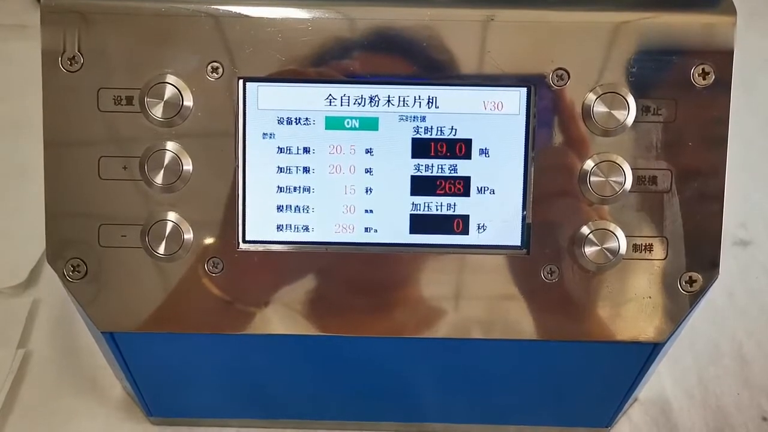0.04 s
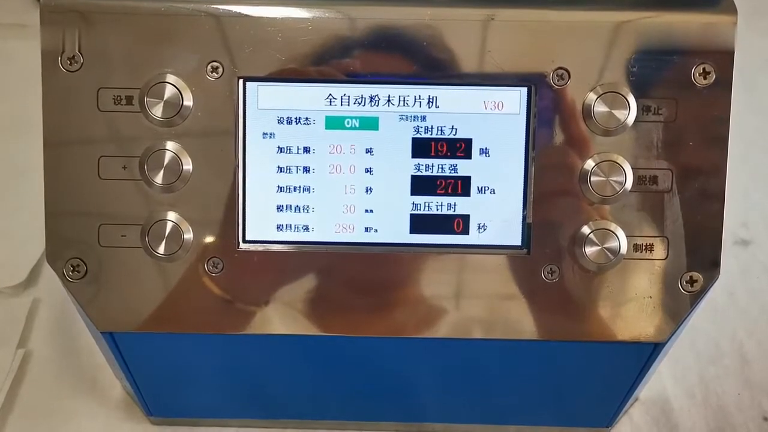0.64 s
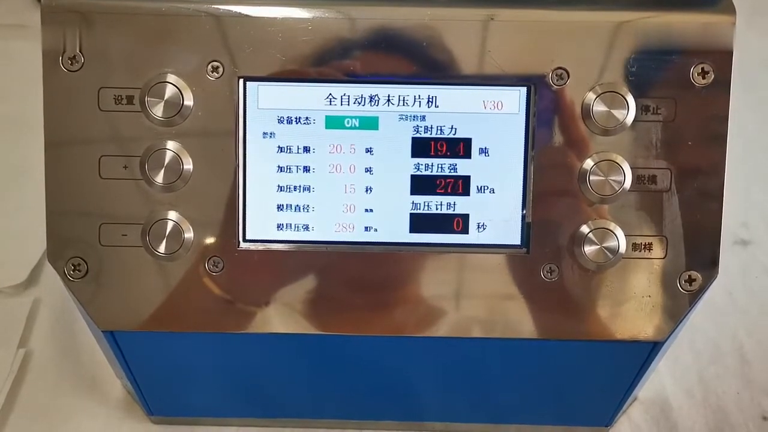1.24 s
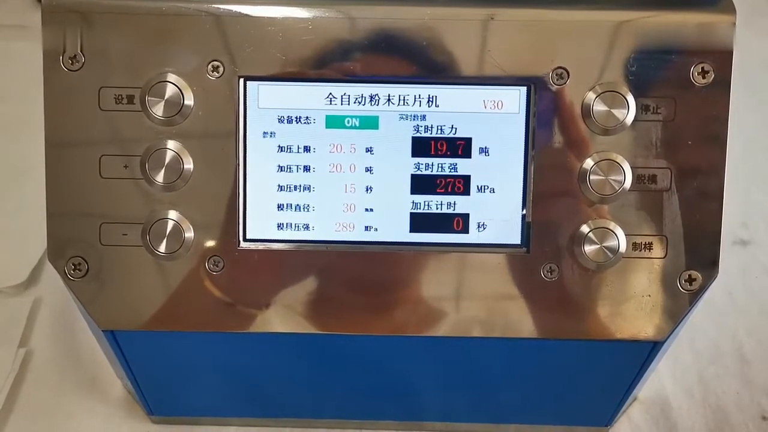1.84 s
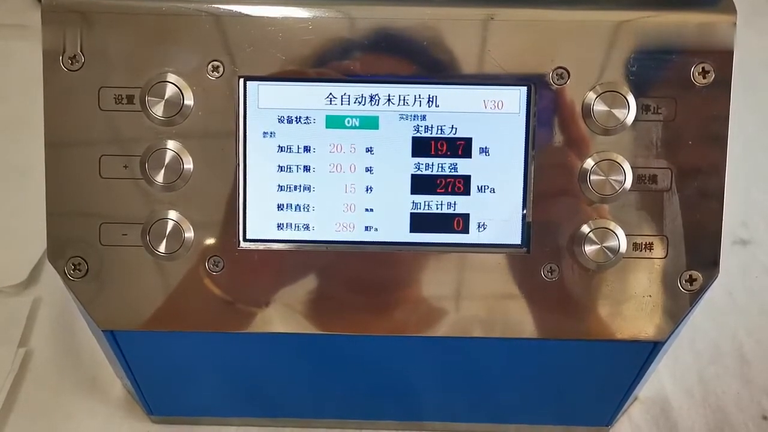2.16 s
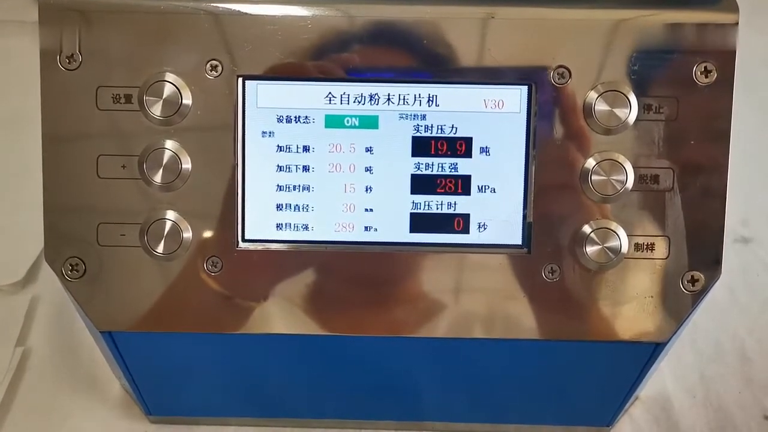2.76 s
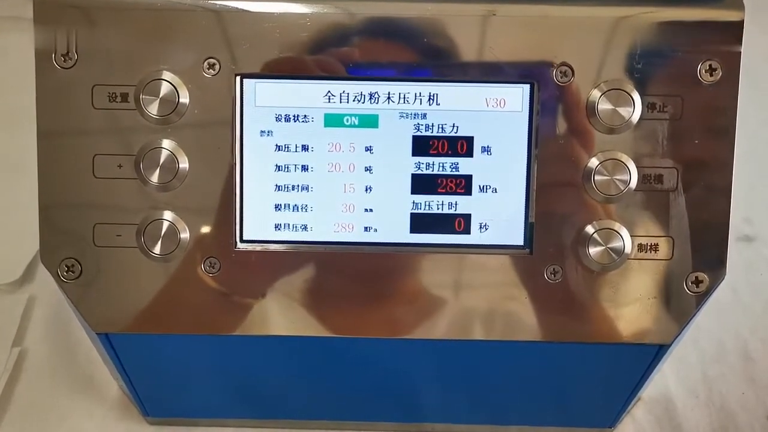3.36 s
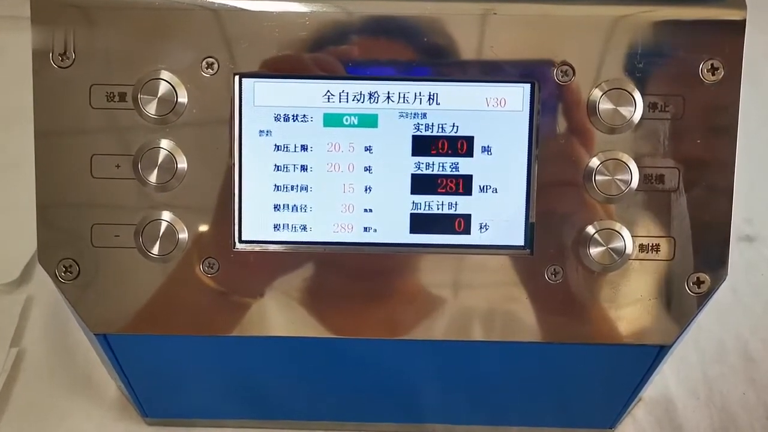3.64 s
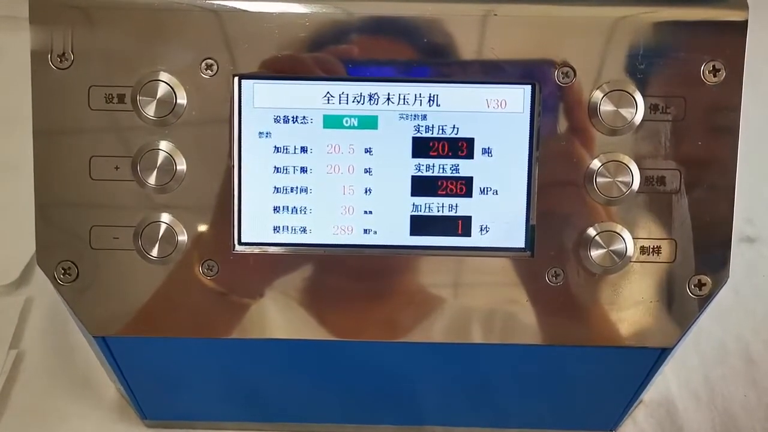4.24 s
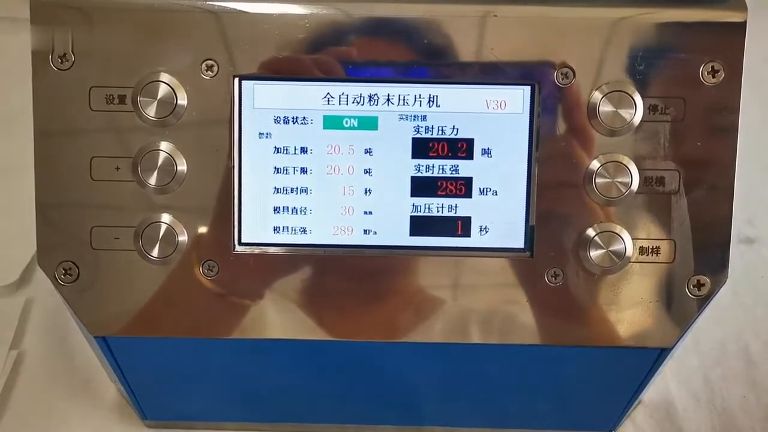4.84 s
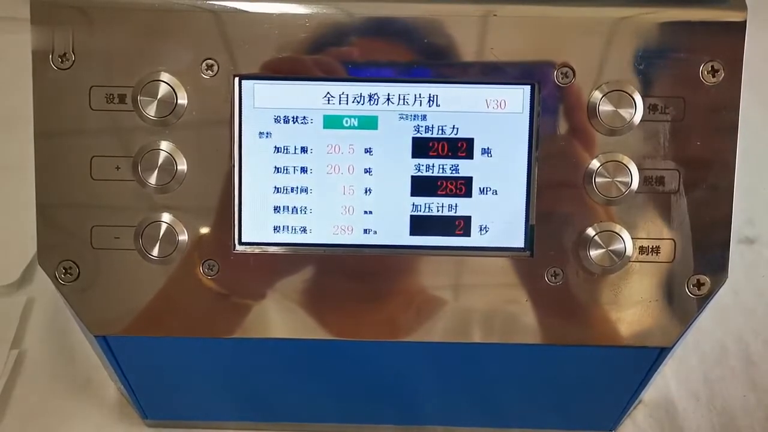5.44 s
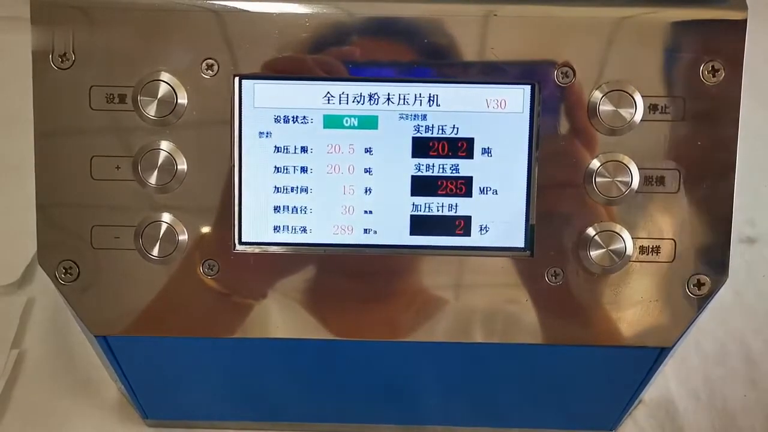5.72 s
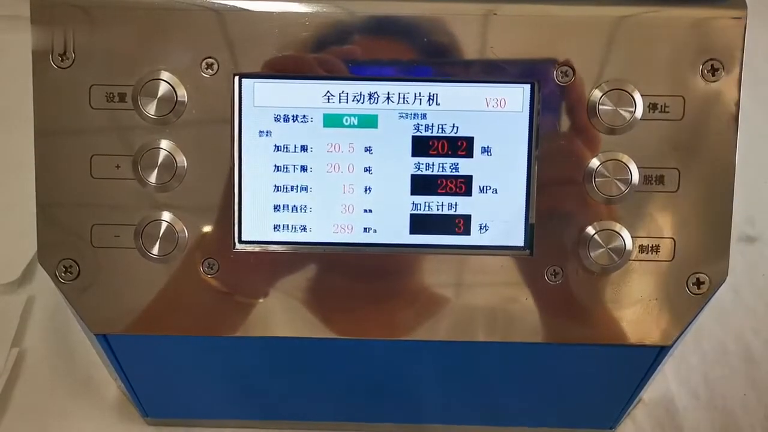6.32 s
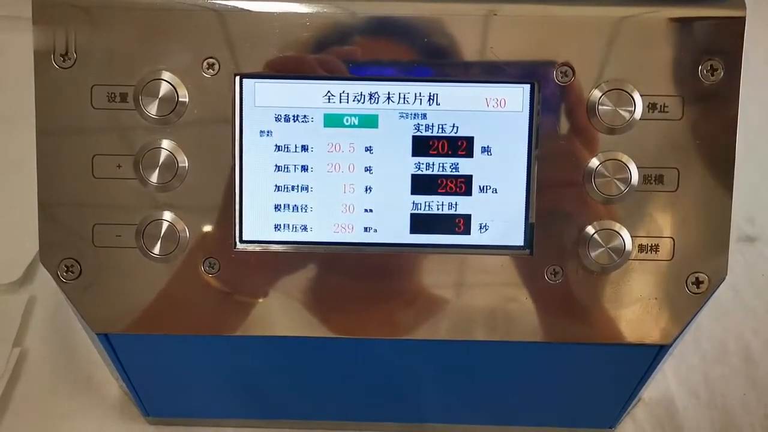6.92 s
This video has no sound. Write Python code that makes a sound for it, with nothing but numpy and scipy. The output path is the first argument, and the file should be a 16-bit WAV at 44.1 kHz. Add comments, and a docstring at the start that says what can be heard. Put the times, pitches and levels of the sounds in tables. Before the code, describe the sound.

With a knock, the geared electric pump of a tablet press starts up loudly. It runs in six short bursts, each rising to a rattling whine and coasting down to a stop, with a metallic ring from the steel cabinet. After the last burst only the lab's low ventilation rumble and hum remain. Near the end come a faint tap and a soft sleeve rustle. The pump sounds close and slightly to the left.

```python
"""First comes a knock and a rising whine: the geared electric pump of a tablet press starts up in a lab.
It runs in six short bursts, each speeding up and coasting to a stop. The gear teeth whine and rattle,
swelling with every piston stroke, and their pitch glides through the ringing notes of a steel cabinet.
Ventilation rumbles and hums underneath. Near the end there is a faint tap, then a sleeve rustles."""
import sys
import numpy as np
from scipy import signal
from scipy.fft import rfft, irfft, next_fast_len
from scipy.io import wavfile

SR = 44100
rng = np.random.default_rng(int(sys.argv[2]) if len(sys.argv) > 2 else 0)


def store_pcm(level_fs):
    """Save levels as 16-bit WAV."""
    pcm = np.round(np.clip(level_fs, -1, 1) * 32767).astype(np.int16)
    wavfile.write(sys.argv[1], SR, np.atleast_2d(pcm).T)


N = 316638
TIME = np.arange(N) / SR
PADDED = next_fast_len(N + SR // 2)
BIN_HZ = np.arange(PADDED // 2 + 1) * SR / PADDED
SIDES = np.array([[.5], [-.5]])   # half up on the left, half down on the right
TEETH_PER_TURN, TEETH_PER_STROKE, FIRST_STROKE_TEETH = 5, 63.2, 13.5

# the low rumble of the ventilation: (frequency [Hz], relative level [dB])
VENT_RUMBLE = [(11, -27), (18, -2), (37, 1.5), (70, -3), (102, -3.5), (169, -5), (194, -6), (216, -6),
               (238, -3.5), (360, -9.5), (385, -7), (407, -14), (436, -15), (480, -22.5), (620, -43),
               (1060, -120)]
# its airy hiss: (frequency [Hz], relative level [dB])
VENT_HISS = [(260, -5.5), (450, -13.5), (558, -0.5), (609, -7), (654, 0.5), (734, -8), (766, -3.5),
             (860, -2), (1340, -12), (2290, -12.5), (2560, -13.5), (4970, -21), (7540, -18.5),
             (14000, -51.5)]
# how alike the air sounds on both sides: (frequency [Hz], likeness [0 unrelated, 1 or more the same])
AIR_LIKENESS = [(60, 0.87), (150, 0.9), (370, 0.87), (930, 0.18), (2300, 0), (5800, 0.28), (8000, 1.2)]
# how much louder the air is on the left: (frequency [Hz], left minus right [dB])
AIR_BALANCE = [(100, 0), (2500, 1), (4500, 3), (6200, 4), (8000, 9.5), (10500, 1.5)]
# steady fan and mains tones: (frequency [Hz], level [dB])
HUM_TONES = [(43.1, -56), (100, -51.5), (231.5, -53), (786, -66.5), (888, -66)]
# strokes of the sleeve: (start [s], end [s], level [dB])
SLEEVE_STROKES = [(6.245, 6.409, -50.5), (6.41, 6.52, -56), (6.522, 6.591, -53)]
# the sound of sliding cloth: (frequency [Hz], relative level [dB])
CLOTH_SPECTRUM = [(300, -10), (900, 3), (1500, -0.5), (2600, 1.5), (4600, -6), (6200, 1.5), (8800, 1.5),
                  (10500, -18), (14000, -33)]
# bands the cabinet lifts or lowers: (frequency [Hz], width [Hz], left gain [dB], right gain [dB])
CABINET_BANDS = [(202, 31, 2.5, 5.5), (384, 15, 10.5, 10.5), (475, 91, 10, 10), (575, 10, 5, 8),
                 (717.7, 22.3, 9, 16.5), (939.7, 30, 10.5, 10), (1077, 40, 5.5, -15.5),
                 (1139, 17, 6.5, 6.5), (1243, 41, 8, 1.5), (1334, 65, 5, 6.5), (1560, 70, 6.5, 7.5),
                 (1707, 78, 3.5, 4.5), (1806, 14, 6, -7), (1878, 13, 12.5, 2.5), (2106, 24, -3, -4),
                 (2440, 16, 11.5, 12), (2864, 36, 12, 2), (3074, 30, 5, 5), (3240, 16, 7, -2.5),
                 (3700, 660, -3.5, -3.5), (3720, 25, 9.5, -6), (4340, 80, 1.5, -12), (4680, 57, 8.5, -7),
                 (4790, 76, -13, -10), (5150, 255, 12.5, -7), (5300, 74, 2, 13), (5350, 83, 1, 0),
                 (5670, 85, 11.5, 8), (5828, 41, 11, 13), (6575, 81, 1, 7.5), (6850, 90, 0.5, 2),
                 (6600, 72, -9, -7), (7390, 35, 9, 6), (7580, 61, 9.5, 7.5), (7900, 57, 11, 12),
                 (8410, 126, 9, 4), (9470, 30, 3, 6)]
# the left side faces the pump: (frequency [Hz], left minus right [dB])
PUMP_BALANCE = [(200, 2), (1500, 2.5), (3300, -0.5), (4500, 5.5), (6300, 9.5), (8300, 2.5), (9300, 1),
                (15000, -0.5)]
# how the pump's waves are out of step at the two sides: (frequency [Hz], left lead [radians])
PUMP_PHASE = [(500, 0), (1150, -.7), (2100, -2.6), (5400, -2.6), (5750, 0)]
# loose gears tap the housing at the last stop: (time [s], strength [dB])
LAST_TAPS = [(3.997, -37), (4.009, -36.5), (4.021, -31), (4.035, -43.5), (4.047, -49)]
# the housing's notes, one low and a cluster above: (frequency [Hz], level [dB], time to fade 60 dB [s])
HOUSING_NOTES = [(402, 0, .2), (1297, -5, .22), (1405, -5, .32), (1462, -7, .25), (1523, -4, .3),
                 (1610, -3, .28), (1690, -5, .22), (1809, -6, .34), (1885, -5, .12)]
# gear knocks just after each start: (time [s], strength [dB])
START_KNOCKS = [(0.0118, -12), (0.6107, -11), (1.2001, -9.5), (1.8186, -8.5), (2.415, -13), (3.4653, -16),
                (3.4779, -10)]
# the notes a knock rings: (frequency [Hz], level [dB], time to fade 60 dB [s])
GEARBOX_NOTES = [(399.5, -19, 0.19), (955, -6.5, 0.14), (1206, -10, 0.13), (1423, -1.5, 0.054),
                 (1599, 5, 0.064), (1760, -6, 0.028)]
# the rattle of teeth and motor brushes: (frequency [Hz], relative level [dB])
RATTLE_SPECTRUM = [(100, -64), (230, -5), (700, -14), (1500, -1), (2100, -1.5), (3700, -1), (5400, -2),
                   (7000, -5.5), (8700, -3), (10000, -22), (10600, -12.5), (12600, -20.5), (15000, -39)]
# the rattle reaches the two sides by many paths: (frequency [Hz], likeness [0 to 1])
RATTLE_LIKENESS = [(400, 1), (1300, 0.23), (4200, 0.035), (5400, 0.26), (5900, 0.93), (12000, 0.84)]
# tones of the spinning rotor: (multiple of the shaft rate, level [dB])
ROTOR_TONES = [(1, -48), (8, -44.5)]
# tones of the gear whine: (multiple of the tooth rate, level [dB], swell on a stroke [dB])
WHINE_TONES = [(1, -35.5, 7.5), (2, -37, 6), (3, -37, 4), (4, -35, -2), (5, -39, 3.5), (6, -37.5, -1.5),
               (7, -41, 6), (8, -45.5, 12)]
# how well the gearbox passes its whine to the air: (frequency [Hz], gain [dB])
WHINE_RESPONSE = [(150, -8), (400, -1), (520, -3.5), (640, -6), (800, -2), (930, 1.5), (1100, 1),
                  (1650, 7.5), (1900, 5.5), (2400, -6), (9000, 0), (10000, 2)]
# the six bursts: (on [s], off [s], standstill [s], full tooth rate [Hz], rattle gain [dB],
# load while coasting [dB])
PUMP_RUNS = [(-.028, 0.249, 0.51, 1124, 0.5, -2), (0.575, 0.853, 1.114, 1130, 0.1, -1),
             (1.173, 1.442, 1.72, 1130, 0.6, 0.5), (1.778, 2.052, 2.317, 1128, .5, 0.5),
             (2.377, 2.653, 2.907, 1137, 0.5, 0), (3.435, 3.817, 4.094, 1110, 0.1, 4)]


def from_db(db):
    """Turn decibels into a gain."""
    return 10 ** (np.asarray(db) / 20)


def unit_power(x):
    """Scale a sound to an average power of 1."""
    return x / np.sqrt(np.mean(x ** 2) + 1e-20)


def curve(points):
    """Read a (frequency, value) table at every frequency in BIN_HZ."""
    hz, value = np.transpose(points)
    return np.interp(np.log(BIN_HZ + 1e-3), np.log(hz), value)


def colour(x, gain):
    """Give each frequency of a sound its own gain."""
    return irfft(rfft(x, PADDED) * gain, PADDED)[..., :N]


def band_pass(x, low_hz, high_hz, order):
    """Keep the sound between two frequencies; a higher order cuts more sharply."""
    return signal.sosfilt(signal.butter(order, [low_hz, high_hz], "band", fs=SR, output="sos"), x)


def drift(hz):
    """A random wobble of size about 1 that changes roughly `hz` times a second."""
    step = 16
    size = PADDED // step
    wobble_hz = np.arange(size // 2 + 1) * SR / step / size
    slow = irfft(rfft(rng.standard_normal(size)) / (1 + (wobble_hz / hz) ** 2), size)
    return np.interp(np.arange(N) / step, np.arange(size), unit_power(slow))


def noise_pair(likeness):
    """White noise for left and right, as alike as the table says."""
    alike = np.clip(curve(likeness), 0, 1)
    shared, opposed = rng.standard_normal((2, N))
    return colour(shared, np.sqrt(1 + alike)) + 2 * SIDES * colour(opposed, np.sqrt(1 - alike))


def ventilation(spectrum, level_db, waver_db):
    """Moving air makes a steady noise that wavers a little."""
    shape = from_db(curve(spectrum) + SIDES * curve(AIR_BALANCE))
    air = unit_power(colour(noise_pair(AIR_LIKENESS), shape))
    return air * from_db(level_db + waver_db * drift(hz=16))


def hum():
    """Fans and mains power give low tones that waver slightly in pitch."""
    return np.sqrt(2) * sum(from_db(db) * np.sin(2 * np.pi * (hz * TIME + .13 * drift(hz=3.9)))
                            for hz, db in HUM_TONES)


def tick(at_s=5.847, fade_s=.06, gain_db=-46):
    """One faint, high tap: a puff of noise that dies quickly."""
    since = TIME - at_s
    burst = rng.standard_normal(N) * (since > 0) * from_db(-60 * np.clip(since / fade_s, 0, 3))
    return from_db(gain_db) * band_pass(burst, 3500, 9500, order=3)


def sleeve(edge_s=.02, pan_db=6):
    """Cloth slides in soft, grainy strokes, toward the left."""
    strokes = sum(from_db(db) * np.clip(np.minimum(TIME - start, end - TIME) / edge_s + .5, 0, 1)
                  for start, end, db in SLEEVE_STROKES)
    fibres = noise_pair(AIR_LIKENESS) * from_db(drift(hz=120))
    cloth = unit_power(colour(fibres, from_db(curve(CLOTH_SPECTRUM))))
    return cloth * strokes * from_db(SIDES * pan_db)


def echoes(x, fade_s, level_db):
    """Surfaces send back a cloud of echoes, one for each side, that drops 60 dB in `fade_s`."""
    t = TIME[:SR // 2]
    cloud = rng.standard_normal((2, len(t))) * from_db(-60 * t / fade_s) * (t > .002)
    cloud /= np.sqrt(np.sum(cloud ** 2, axis=1, keepdims=True))
    return from_db(level_db) * signal.fftconvolve(x, cloud, axes=1)[:, :N]


def resonance(x, hz, width_hz, gain_db):
    """Lift one narrow band so that it rings, or lower it to leave a hollow."""
    r = np.exp(-np.pi * width_hz / SR)   # share of the ringing left after one sample
    feedback = [1, -2 * r * np.cos(2 * np.pi * hz / SR), r * r]
    band = signal.lfilter(np.array([1, 0, -1]) * (1 - r * r) / 2, feedback, x)
    return x + (from_db(gain_db) - 1) * band


def cabinet(x):
    """The steel panels ring; each side hears them with its own strength and timing."""
    left, right = x
    for hz, width_hz, left_db, right_db in CABINET_BANDS:
        left = resonance(left, hz, width_hz, left_db)
        right = resonance(right, hz, width_hz, right_db)
    placement = from_db(SIDES * curve(PUMP_BALANCE)) * np.exp(1j * SIDES * curve(PUMP_PHASE))
    return colour(np.array([left, right]), placement)


def struck(times, blows_db, notes):
    """Each blow sets the metal's notes ringing, each with a slightly random strength."""
    t, out = TIME[:SR // 2], np.zeros((2, N + SR))
    rise = np.minimum(t / .0006, 1)
    starts = (np.maximum(times, 0) * SR).astype(int)
    for hz, note_db, fade_s in notes:
        lead = SIDES * np.interp(hz, *np.transpose(PUMP_PHASE))
        ring = rng.choice([-1, 1]) * np.sin(2 * np.pi * hz * t + lead) * from_db(-60 * t / fade_s)
        for start, db in zip(starts, blows_db):
            out[:, start:start + len(t)] += rise * ring * from_db(db + note_db + rng.normal(0, 1))
    return out[:, :N]


def last_clatter():
    """As the pump stops for good, loose gears tap the housing and leave it ringing."""
    at, db = np.transpose(LAST_TAPS)
    return struck(at + .001 * rng.standard_normal(len(at)), db, HOUSING_NOTES)


def knocks(gain_db=-7.5, pan_db=2, bounce_s=.0055, bounce_loss_db=5):
    """The gears knock as they take up the piston's load, bouncing and ringing the gearbox."""
    bounce = np.arange(3)
    at, db = np.transpose(START_KNOCKS)
    times = at[:, None] + bounce_s * bounce * rng.uniform(.673, 1.2, (len(at), len(bounce)))
    blows_db = db[:, None] - bounce_loss_db * bounce
    return struck(times.ravel(), blows_db.ravel(), GEARBOX_NOTES) * from_db(gain_db + SIDES * pan_db)


def motion(spin_up_s=.063, drag=1.5, grip=6.5):
    """The motor's speed (0-1), gear teeth passed since switch-on, and starting current (0-1)."""
    speed, teeth, current = np.zeros((3, N))
    for on, off, still, full_hz, *_ in PUMP_RUNS:
        now = (TIME >= on) & (TIME < still)
        t = np.arange(on, still + 1 / SR, 1 / SR)
        spin_up = 1 - np.exp(-(np.minimum(t, off) - on) / spin_up_s)
        coasted = np.clip((t - off) / (still - off), 0, 1)
        # drag slows the shaft, then friction stops it (the higher `grip`, the later it bites)
        turning = spin_up * np.exp(-drag * coasted) * (1 - coasted ** grip)
        speed[now] = np.interp(TIME[now], t, turning)
        teeth[now] = np.interp(TIME[now], t, np.cumsum(turning) * full_hz / SR)
        current[now] = np.interp(TIME[now], t, 1 - spin_up)
    return speed, teeth, current


def run_gains():
    """Each burst has its own amount of rattle and of load while coasting."""
    on, *_, rattle_db, load_db = np.transpose(PUMP_RUNS)
    run = np.maximum(np.searchsorted(on, TIME, side="right") - 1, 0)
    return from_db(rattle_db[run]), from_db(load_db[run])


def piston_load(stroke, sharpness, return_share):
    """Load on the gears (-1 to 1): it peaks on the push, and by `return_share` on the way back."""
    push = ((1 + stroke) / 2) ** sharpness
    pull = ((1 - stroke) / 2) ** sharpness
    return 2 * (push + return_share * pull) - 1


def brush_shriek(speed, hz=5215, width_hz=190, gain_db=-32, pan_db=13.5):
    """The motor brushes keep a high note ringing; it eases at full speed and fades as the shaft stops."""
    ring = unit_power(band_pass(rng.standard_normal(N), hz - width_hz / 2, hz + width_hz / 2, order=2))
    ease_db = -6 * speed ** 6
    return ring * speed * from_db(gain_db + ease_db + SIDES * pan_db)


def rotor(speed, teeth):
    """The off-balance rotor and its sliding contacts hum, roughened by loose bearings."""
    out = np.zeros(N)
    for multiple, level_db in ROTOR_TONES:
        cycles = multiple * teeth / TEETH_PER_TURN + .17 * drift(hz=35)
        shake_db = 3.5 * drift(hz=40)
        out += from_db(level_db + shake_db) * np.sin(2 * np.pi * cycles)
    return np.sqrt(2) * out * speed ** 2


def growl(speed, teeth, coasting_load, gain_db=-33.5, overtone_db=-4):
    """Coasting against the oil pressure, the teeth growl in a low, falling tone."""
    tone = sum(from_db(overtone_db * (k - 1)) * np.sin(2 * np.pi * (k * teeth + rng.random()))
               for k in range(1, 4))
    effort = coasting_load * (1 - speed) * speed ** .6
    return band_pass(tone * effort, 340, 720, order=3) * from_db(gain_db)


def strain(speed, teeth, stroke, gain_db=-15.5, roughness=.26, band_hz=(950, 1950)):
    """A slow motor barks as it forces the piston through a stroke."""
    uneven = teeth + .028 * drift(hz=75)
    buzz = unit_power(sum(np.sin(2 * np.pi * (k * uneven + rng.random())) for k in range(2, 7)))
    rasp = unit_power(band_pass(noise_pair(RATTLE_LIKENESS), *band_hz, order=3))
    bark = band_pass(buzz, *band_hz, order=3) + roughness * rasp
    push = ((1 + stroke) / 2) ** 14.4   # a short peak on each stroke
    return bark * push * 2 * speed * (1 - speed) * from_db(gain_db)


def loose_gears(speed, stroke, current, gain_db=-25.5, swell_db=2.5, taut_db=-2.5):
    """Slow gears clatter dully as the piston turns round, less while the starting motor holds them taut."""
    grains = noise_pair(RATTLE_LIKENESS) * from_db(1.5 * drift(hz=660))
    clatter = unit_power(band_pass(grains, 370, 2000, order=2))
    load = piston_load(stroke, sharpness=13, return_share=1)
    slack = speed ** .68 * (1 - speed) ** 2
    return clatter * from_db(gain_db + swell_db * load + taut_db * current) * slack


def tooth_after_tooth(noise, teeth, count=5, memory=.5):
    """Each scrape resembles the last few, giving the noise a rough pitch that follows the speed."""
    tooth_s = 1 / np.clip(np.gradient(teeth) * SR, 100, 1500)
    repeats = [sum(memory ** k * np.interp(TIME - k * tooth_s, TIME, side) for k in range(count))
               for side in noise]
    return unit_power(np.array(repeats))


def rattle(speed, teeth, stroke, current, gain_db=-28, tooth_db=3, swell_db=2.5, start_db=6):
    """Every tooth scrapes, louder with speed, load and starting current."""
    load = piston_load(stroke, sharpness=2.36, return_share=.82)
    pulses = from_db(tooth_db * np.cos(2 * np.pi * teeth))
    rubbing = tooth_after_tooth(noise_pair(RATTLE_LIKENESS), teeth)
    middle = colour(rubbing, 1 / (1 + (BIN_HZ / 6600) ** 16))
    treble = rubbing - middle
    grains = sum(part * from_db(2.2 * drift(hz=70)) for part in (middle, treble))   # each flickers alone
    scrapes = colour(pulses * grains, from_db(curve(RATTLE_SPECTRUM)))
    scrapes /= np.std(scrapes[:, speed > 0])
    bite = speed ** 2 / (speed ** 2 + .22 ** 2)   # creeping gears slide silently
    return scrapes * from_db(gain_db + swell_db * load + start_db * current) * speed ** .52 * bite


def whine(speed, teeth, stroke, current, start_db=-2.5):
    """Meeting gear teeth sing a stack of tones that swell and sag with each piston stroke."""
    twist = .04 * drift(hz=55) - .2 * stroke
    jitter = (.028 + .038 * (1 - speed)) * drift(hz=119)   # slow teeth meet less evenly
    uneven = teeth + twist + jitter
    load = piston_load(stroke, sharpness=1.8, return_share=.15)
    tones = np.zeros(N)
    for multiple, level_db, swell_db in WHINE_TONES:
        # the contact between teeth wanders, so each tone beats and breaks up
        contact = 1 + .38 * (drift(hz=45) + 1j * drift(hz=45))
        strength = np.minimum(np.abs(contact), 1.4)
        phase = 2 * np.pi * (multiple * uneven + rng.random()) + np.angle(contact)
        tones += from_db(level_db + swell_db * load * speed) * strength * np.sin(phase)
    tones *= 1 + .065 * np.cos(2 * np.pi * teeth / TEETH_PER_TURN)   # the gear is slightly off centre
    radiated = colour(tones, from_db(curve(WHINE_RESPONSE)))
    return np.sqrt(2) * radiated * speed * from_db(start_db * current)


def pump():
    """One motor drives all the gear sounds; its tones and grinding pass through the cabinet."""
    speed, teeth, current = motion()
    stroke = np.cos(2 * np.pi * (teeth - FIRST_STROKE_TEETH) / TEETH_PER_STROKE)   # 1 on the push
    rattle_gain, load_gain = run_gains()
    coasting = np.gradient(speed) < 0
    load = np.where(coasting, load_gain, 1)
    tones = whine(speed, teeth, stroke, current) + rotor(speed, teeth)
    tones += growl(speed, teeth, coasting * load)
    grinding = rattle(speed, teeth, stroke, current) * rattle_gain
    grinding += strain(speed, teeth, stroke) * load
    grinding += loose_gears(speed, stroke, current)
    return cabinet(tones + grinding) + brush_shriek(speed) + knocks() + last_clatter()


def scene():
    """The pump and its echoes from bench and room, over the quiet sounds of the lab."""
    direct = pump()
    bench = echoes(direct, fade_s=.038, level_db=-14)
    dull = signal.sosfilt(signal.butter(2, 2370, fs=SR, output="sos"), direct)   # walls soak up treble
    room = echoes(dull, fade_s=.32, level_db=-9.5)
    rumble = ventilation(VENT_RUMBLE, level_db=-41.5, waver_db=.9)
    hiss = ventilation(VENT_HISS, level_db=-51, waver_db=.4)
    return direct + bench + room + rumble + hiss + hum() + tick() + sleeve()


def record(dry):
    """Round off the loudest peaks and cut the highest treble steeply."""
    ceiling, cutoff_hz = .85, 15600
    rounded = dry / (1 + (dry / ceiling) ** 6) ** (1 / 6)
    return signal.sosfilt(signal.cheby2(14, 60, cutoff_hz, fs=SR, output="sos"), rounded)


dry = scene()
out = record(dry)
store_pcm(out)
```